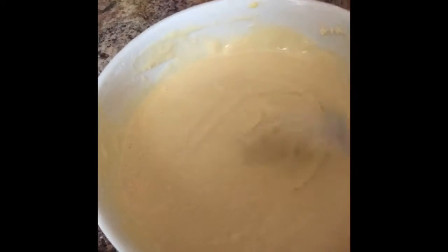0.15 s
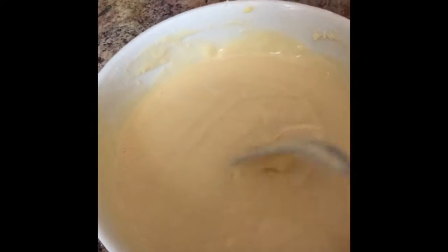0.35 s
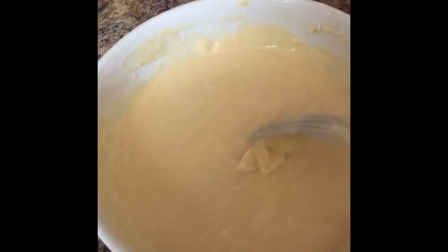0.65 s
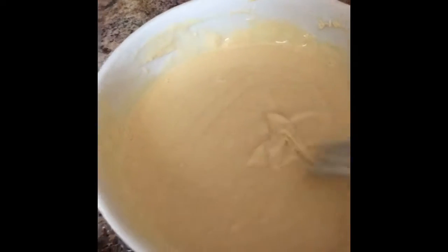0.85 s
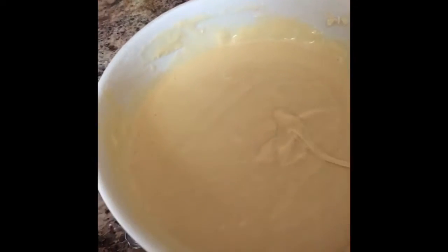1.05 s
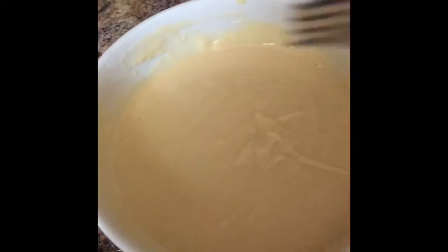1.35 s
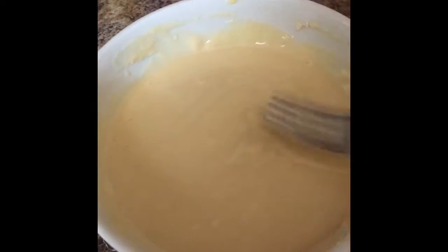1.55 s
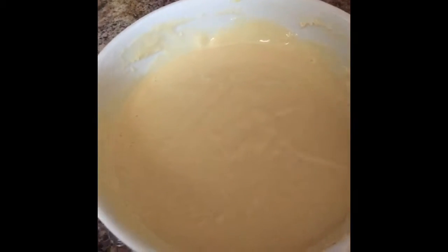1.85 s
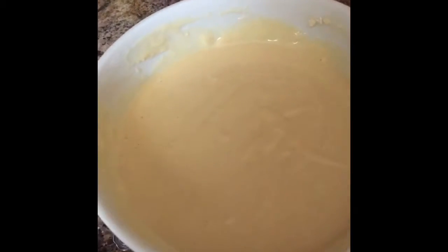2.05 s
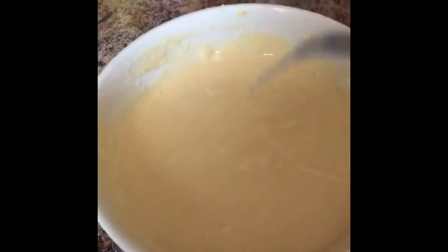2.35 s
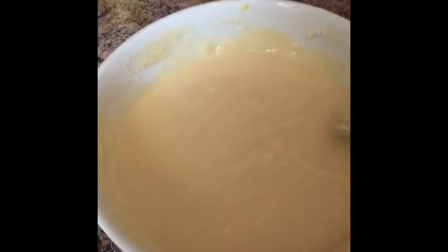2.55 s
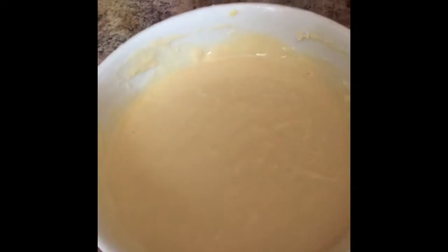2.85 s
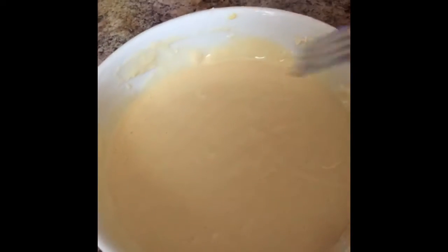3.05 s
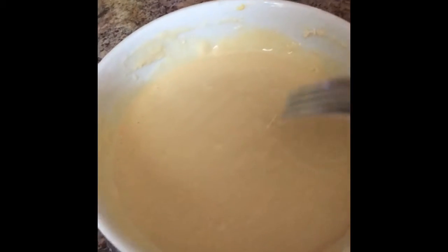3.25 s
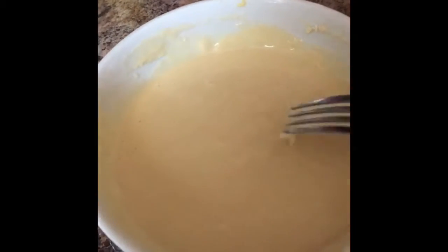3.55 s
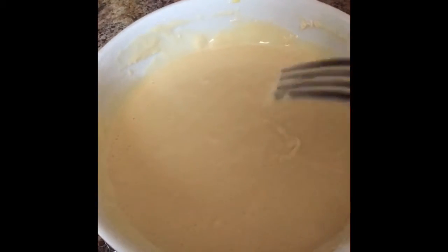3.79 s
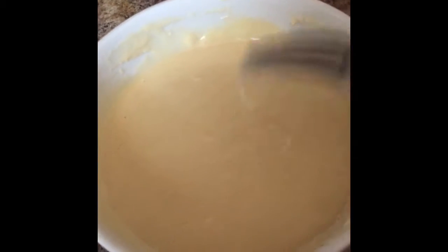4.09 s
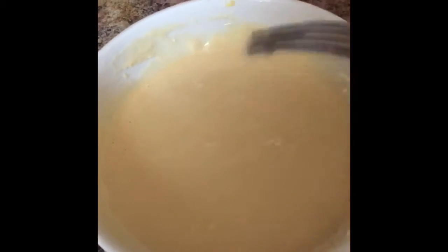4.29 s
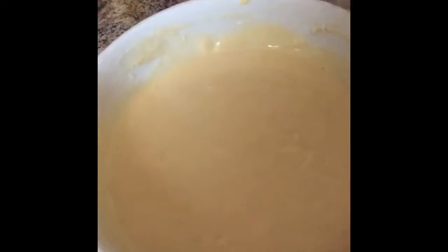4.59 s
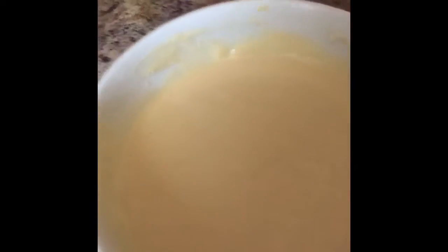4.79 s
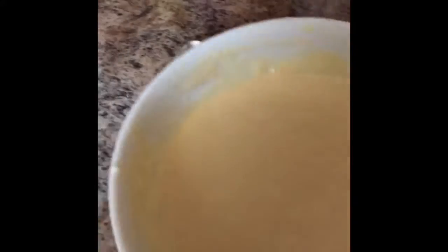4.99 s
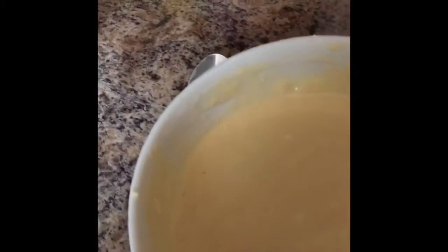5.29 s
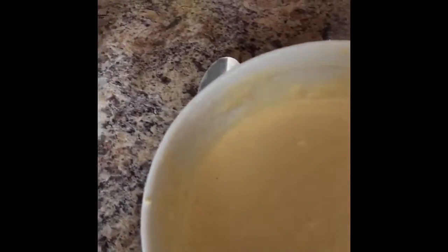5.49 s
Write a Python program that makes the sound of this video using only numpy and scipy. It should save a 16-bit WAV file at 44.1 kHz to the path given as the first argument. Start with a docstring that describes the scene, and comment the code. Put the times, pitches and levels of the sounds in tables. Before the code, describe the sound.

A fork clacks on the rim of a china bowl of batter in two quick runs, with single taps and wet slides between, over faint hum.

```python
"""A soft hum over room noise; then a fork knocks the rim of a china bowl of batter: two fast runs, two single taps between.
Each tap is a steel clack (filtered noise bursts), the ring of the bowl (decaying sines) and a thud into the counter (noise).
Between taps the fork slides wetly (bubble bursts), batter plops and tines graze the wall; faint rustles come last.
A small kitchen answers with decaying noise echoes; the close microphone's limiter ducks peaks above its ceiling."""
import sys
import numpy as np
from scipy import signal
from scipy.io import wavfile
from scipy.ndimage import uniform_filter1d, minimum_filter1d

SR = 44100
rng = np.random.default_rng(int(sys.argv[2]) if len(sys.argv) > 2 else 0)


def wav_record(signal):
    """Record a signal, one row per channel, as 16-bit PCM in the file named by sys.argv[1]."""
    frames = np.transpose(np.atleast_2d(signal))
    bounded = np.clip(frames, -1, 1)
    # unit amplitude maps onto the largest positive 16-bit level
    quanta = np.round(bounded * 32767).astype(np.int16)
    wavfile.write(sys.argv[1], SR, quanta)


N = 248283
TIME = np.arange(N) / SR
EDGES_HZ = np.geomspace(35, 17000, 28)
CENTRES_HZ = np.sqrt(EDGES_HZ[1:] * EDGES_HZ[:-1])
BANK = [signal.butter(2, EDGES_HZ[k:k + 2], "band", fs=SR, output="sos") for k in range(len(CENTRES_HZ))]


def from_db(db):
    """Decibels to amplitude."""
    return 10 ** (np.asarray(db) / 20)


def rms_one(x):
    """Scale to unit rms."""
    return x / np.sqrt(np.mean(x ** 2) + 1e-20)


def at_hz(points, hz):
    """Read a table on a log-frequency axis."""
    freqs, values = np.transpose(points)
    return np.interp(np.log(hz), np.log(freqs), values)


def dying(t, t60_s):
    """Exponential decay, 60 dB down at t60_s."""
    return np.exp(-np.log(1000) * t / t60_s)


def add(out, start_s, sound):
    """Mix a sound in from start_s."""
    start = int(start_s * SR)
    out[start:start + len(sound)] += sound[:N - start]


def bands(white):
    """Third-octave bands; neighbours are drawn from two unrelated inputs."""
    return np.array([signal.sosfilt(band, white[k % 2] + 1e-18) for k, band in enumerate(BANK)])


def resonance(x, hz, width_hz):
    """Two-pole resonance that keeps the power of white noise."""
    r = np.exp(-np.pi * width_hz / SR)
    gain = np.sqrt((1 - r * r) / 2)
    poles = [1, -2 * r * np.cos(2 * np.pi * hz / SR), r * r]
    return signal.lfilter(gain * np.array([1, 0, -1]), poles, x + 1e-18)


def strokes(rows, release_db_per_s, swell_db=30):
    """Gain of a row of strokes: each swells by swell_db over swell_s, holds and dies away."""
    gain = 0
    for full_s, swell_s, hold_s, level_db in rows:
        rise_db = swell_db * np.maximum(full_s - TIME, 0) / swell_s
        fall_db = release_db_per_s * np.maximum(TIME - full_s - hold_s, 0)
        gain = gain + from_db(level_db - rise_db - fall_db)
    return gain


# appliance hum: pitch_hz, level_db (rms)
HUM = [(59.2, -51), (118.4, -59.5), (199.2, -58.5), (306.8, -64.5)]
# quiet room noise: pitch_hz, density_db (per Hz)
AIR = [(35, -21), (55, 1), (85, -5), (160, 0.5), (250, -4), (350, 2.5), (630, -10.5), (1000, -12.5),
       (2000, -23.5), (4000, -27.5), (8000, -35), (13000, -29.5), (16000, -31.5)]
AIR_DB = -55


def background(waver=0.2):
    """An appliance hums, a little unsteadily in level and phase, over the soft noise of the room."""
    air = rms_one(from_db(at_hz(AIR, CENTRES_HZ)) @ bands(rng.standard_normal((2, N))))
    knots_s = np.linspace(0, TIME[-1], num=40)
    hum = 0
    for hz, level_db in HUM:
        swell, lag = [np.interp(TIME, knots_s, row) for row in rng.normal(0, waver, (2, len(knots_s)))]
        tone = np.sin(2 * np.pi * hz * TIME + lag * hz / HUM[0][0])
        hum = hum + from_db(level_db) * np.sqrt(2) * (1 + swell) * tone
    return from_db(AIR_DB) * air + hum


# fork on rim: start_s, force_db, weight_db (hand behind it), place (0 neck, 1 tines, 1.5 very tips),
#   lower_ring_db, upper_ring_db (wall; vary with where the rim is struck)
TAPS = [(0.2532, -33, -28.5, 0.068, 1, 3.5), (0.4037, -28, -23.5, 0.039, 1, 3),
        (0.5778, -26.5, -22, 0.021, 0.5, 3), (0.7297, -26.5, -27, 0.16, -3.5, 2),
        (1.6341, -34.5, -31, 0.08, 3, 5), (2.5394, -31.5, -33.5, 1.45, 8.5, 3.5),
        (3.2646, -30.5, -30.5, 1.73, 5.5, -8.5), (3.42, -27.5, -26, 0.92, 2.5, -5.5),
        (3.577, -27.5, -25.5, 0.94, 1.5, -4), (3.7355, -28, -26.5, 1.32, -3, -5.5),
        (3.8991, -29.5, -30, 0.94, -3, 3.5), (4.054, -28, -29, 0.62, -2, 2),
        (4.2302, -24.5, -25.5, 0.66, -9, -6), (4.4132, -23, -28, 0.62, -8, -5.5)]
# fork drops back on the rim after the last hard taps: start_s, force_db
BOUNCES = [(3.913, -43.5), (4.0696, -34.5), (4.2472, -33), (4.431, -29.5)]
BOUNCE_PLACE, BOUNCE_WALL_DB = 0.4, -22   # it stays pressed on and damps the wall


def blows():
    """Taps and bounces alike, in the columns of TAPS."""
    return TAPS + [(s, db, db, BOUNCE_PLACE, BOUNCE_WALL_DB, BOUNCE_WALL_DB) for s, db in BOUNCES]


# contact spectrum, dull neck to bright tines: pitch_hz, neck_db, tines_db
CONTACT = [(500, 0, 0), (1090, -1.5, 1), (1800, -1, -5), (3200, 1.5, -6), (4700, 0.5, -5.5),
           (7000, -13, 11.5), (10500, 0, 8.5), (13400, -3.5, 9.5)]
WEIGHT_BELOW_HZ, FORCE_ABOVE_HZ = 200, 300
SIZZLE_HZ, SIZZLE_DB = 14800, 13   # the very tips sizzle: dB per unit of place beyond the tines


def drive(hz, force_db, weight_db, place):
    """How hard a blow drives each frequency (dB): the hand's weight sets the bass, force and place the rest."""
    freqs, neck_db, tines_db = np.transpose(CONTACT)
    contact_db = force_db + neck_db + min(place, 1) * (tines_db - neck_db)
    sizzle_db = contact_db[-1] + SIZZLE_DB * max(place - 1, 0)
    bass = [(WEIGHT_BELOW_HZ, weight_db), (FORCE_ABOVE_HZ, contact_db[0])]
    return at_hz([*bass, *zip(freqs, contact_db), (SIZZLE_HZ, sizzle_db)], hz)


LOWER_RINGS_HZ, RING_OCTAVES, UPPER_RING_HZ = (1785, 3150), .17, 4000
WALL_RING_HZ = 4700   # drive is read no higher than this


def wall_drive(hz, force_db, weight_db, place, lower_db, upper_db):
    """Drive of the bowl's modes (dB); the wall's two lower rings move together, as do all its upper ones."""
    lower = sum(np.abs(np.log2(hz / ring_hz)) < RING_OCTAVES for ring_hz in LOWER_RINGS_HZ)
    blow_db = drive(np.minimum(hz, WALL_RING_HZ), force_db, weight_db, place)
    return blow_db + lower_db * lower + upper_db * (hz > UPPER_RING_HZ)


NECK_SPOT_HZ, TINES_SPOT_HZ = 510, 900
SPOT_DB, SPOT_OCTAVES = 6, .25


def spot(hz, place):
    """The place that is struck favours one register of the bowl (dB)."""
    favoured_hz = NECK_SPOT_HZ * (TINES_SPOT_HZ / NECK_SPOT_HZ) ** min(place, 1)
    return SPOT_DB * np.exp(-(np.log2(hz / favoured_hz) / SPOT_OCTAVES) ** 2)


# colour of the steel contact: pitch_hz, density_db (per Hz)
CLACK = [(200, 9), (600, 2), (900, 11.5), (1300, -15), (2300, -2.5), (3600, 6.5), (4800, -7), (5800, 3.5),
         (8000, -1.5), (10000, 3.5), (12300, -5), (15500, 0)]
# fork resonances: pitch_hz, level_db, best_place (on the fork, excites it most)
FORK = [(6400, 0.5, .25), (9200, -1, 2.7), (10380, -6.5, 2), (10800, 1.5, .15), (13150, -2.5, 0.37),
        (15100, 5, 4.2)]
# broad clang of the wall while steel touches it: pitch_hz, width_hz, level_db
CLANG = [(1785, 130, -2), (2400, 300, -7), (3170, 170, -1), (4830, 300, 3), (6740, 200, -8)]
CLACK_DB, CLANG_DB, CLACK_DECAY_S = 27.5, 21.5, 0.0026
TINE_DB, TINE_WIDTH_HZ = 16.5, 450
FORK_REACH = 0.91   # how far from its best place a resonance still answers


def clacks(touch_s=0.0008):
    """Steel chatters on china for a few ms, driving fork and wall; the nearer the tips it lands, the brighter."""
    out, t = np.zeros(N), TIME[:SR // 12]
    envelope = np.exp(-t / CLACK_DECAY_S) * (1 - np.exp(-t / touch_s))
    for start_s, force_db, weight_db, place, *rings_db in blows():
        blow = force_db, weight_db, place
        chatter = rng.standard_normal((3, len(t))) * envelope
        strength_db = drive(CENTRES_HZ, *blow) + spot(CENTRES_HZ, place)
        add(out, start_s, from_db(CLACK_DB + strength_db + at_hz(CLACK, CENTRES_HZ)) @ bands(chatter))
        for hz, level_db, best_place in FORK:
            reach_db = -10 * ((place - best_place) / FORK_REACH) ** 2
            gain = from_db(TINE_DB + level_db + drive(hz, *blow) + reach_db)
            add(out, start_s, gain * resonance(chatter[2], hz, TINE_WIDTH_HZ))
        for hz, width_hz, level_db in CLANG:
            gain = from_db(CLANG_DB + level_db + wall_drive(hz, *blow, *rings_db))
            add(out, start_s, gain * resonance(chatter[2], hz, width_hz))
    return out


# bowl on the counter, lowest its rocking, highest the china wall: pitch_hz, level_db, t60_s
BOWL = [(63, 6, .18), (110.86, 10.5, 0.2), (208.8, 8.5, .21), (296, 0.5, 0.21), (377, 3.5, .15),
        (445, 3, .15), (490.7, 1, 0.18), (537.2, 3, .16), (824.5, 0, .17), (867, 0.5, 0.16),
        (1298, -6, 0.15), (1789, -1.5, 0.26), (2410, -8, 0.17), (3144, -0.5, 0.14), (4766, -3, 0.23),
        (4710, -2, 0.33), (4786, -4.5, .3), (5100, -11, 0.12), (6737, -10.5, 0.28)]


def bowl(spread_db=1.0, detune=0.012, push_s=0.015, twin_hz=35, twin_db=-4):
    """Every blow rings the bowl's modes; the low ones build with the push, the higher beat against a close twin."""
    out, t = np.zeros(N), TIME[:SR * 2 // 3]
    hz, mode_db, t60_s = np.transpose(BOWL)
    low = np.clip(300 / hz, 0, 1)
    envelope = dying(t, t60_s[:, None]) * (1 - np.exp(-t / (push_s * low[:, None])))
    for start_s, force_db, weight_db, place, *rings_db in blows():
        strength_db = wall_drive(hz, force_db, weight_db, place, *rings_db) + spot(hz, place)
        luck, shift, split = rng.standard_normal((3, len(hz)))
        pitch_hz = hz * (1 + detune * low * shift)   # moving batter loads the low modes
        twin_pitch_hz = pitch_hz + twin_hz * (1 - low) * split
        swing = np.sin(2 * np.pi * pitch_hz[:, None] * t)
        swing += from_db(twin_db) * np.cos(2 * np.pi * twin_pitch_hz[:, None] * t)
        add(out, start_s, from_db(mode_db + strength_db + spread_db * luck) @ (swing * envelope))
    return out


# dull rumble of bowl and counter: pitch_hz, density_db (per Hz)
RUMBLE = [(40, -14.5), (80, -5), (120, 2), (210, -5), (320, -3.5), (500, -8), (850, -13.5), (1400, -15),
          (2500, -26.5), (6000, -57)]
RUMBLE_DB, RUMBLE_PEAK_S = 21.5, .011


def rumble(delay_s=.009):
    """Just after each blow the heavy bowl judders on the counter."""
    out, t = np.zeros(N), TIME[:SR // 6]
    envelope = t / RUMBLE_PEAK_S * np.exp(1 - t / RUMBLE_PEAK_S)
    for start_s, force_db, weight_db, place, *_ in blows():
        judder = rng.standard_normal((2, len(t))) * envelope
        strength_db = drive(np.minimum(CENTRES_HZ, FORCE_ABOVE_HZ), force_db, weight_db, place)
        strength_db = strength_db + spot(CENTRES_HZ, place) + at_hz(RUMBLE, CENTRES_HZ)
        add(out, start_s + delay_s, from_db(RUMBLE_DB + strength_db) @ bands(judder))
    return out


# reverberation: pitch_hz, t60_s
ROOM_T60 = [(100, 1), (1000, 0.38), (4000, 0.32), (9000, .29), (16000, 0.2)]
ROOM_DB = -12


def kitchen(x, first_echo_s=0.0023, bass_hz=300):
    """Dense reflections that die sooner in the treble; the bass stays close and dry."""
    t = TIME[:SR // 2]
    tails = bands(rng.standard_normal((2, len(t)))) * dying(t, at_hz(ROOM_T60, CENTRES_HZ)[:, None])
    echo = (CENTRES_HZ / (CENTRES_HZ + bass_hz)) @ tails * np.clip(t / first_echo_s - 1, 0, 1)
    return signal.fftconvolve(x, echo / np.sqrt(np.sum(echo ** 2)))[:N]


# fork sliding through batter along the wall: full_s, swell_s, hold_s, level_db
SLIDES = [(.9, 0.083, 0.01, -50.5), (1.008, 0.013, 0.026, -49), (1.195, 0.11, .005, -61),
          (1.74, .1, 0.17, -54), (1.93, 0.041, .055, -70.5), (2.65, 0.15, 0.0042, -43.5)]
# bubble spectrum: pitch_hz, density_db (per Hz)
SLIDE_COLOUR = [(400, 1.5), (1000, -0.5), (2400, -11), (4500, -7.5), (8000, -11.5), (12000, -9.5),
                (16000, -16)]
SLIDE_RELEASE_DB_PER_S = 172


def slide(bubbles_per_s=130, size_db=4, cycles=20, wall_db=-3, wall_width_hz=45):
    """Tiny bubbles of many sizes burst around the tines, whose rubbing keeps the china wall singing."""
    level = strokes(SLIDES, SLIDE_RELEASE_DB_PER_S)
    fizz = np.zeros(N)
    for hz in np.geomspace(500, 15000, num=24):   # bubbles_per_s at each pitch
        at = np.flatnonzero(rng.random(N) < bubbles_per_s / SR)
        bursts = np.zeros(N)
        bursts[at] = from_db(size_db * np.minimum(rng.exponential(1, N)[at], 4))
        fizz += from_db(at_hz(SLIDE_COLOUR, hz)) * np.sqrt(hz) * resonance(bursts, hz, hz / cycles)
    rubbing = level * rng.standard_normal(N)
    wall = sum(from_db(db) * resonance(rubbing, hz, wall_width_hz) for hz, _, db in CLANG)
    return level * rms_one(fizz) + from_db(wall_db) * wall


# batter sucking and dripping: start_s, level_db, pitch_hz (at the start)
PLOPS = [(0.899, -32, 880), (0.905, -25, 189), (0.985, -39.5, 2200), (1.009, -38.5, 504),
         (1.784, -37, 3900), (1.815, -41, 2340), (1.833, -39, 6950), (1.884, -38, 4540),
         (2.619, -35.5, 2100), (2.637, -31, 2390), (2.643, -33, 4520), (2.721, -49, 2420)]
PLOP_T60_S = 0.1


def plops(rise_per_s=1.3, swell_s=0.0027, rough=0.73):
    """Air pockets open in the batter: short, rough rings that rise in pitch."""
    out, t = np.zeros(N), TIME[:SR // 8]
    envelope = dying(t, PLOP_T60_S) * (1 - np.exp(-t / swell_s))
    for start_s, level_db, hz in PLOPS:
        tone = np.sin(2 * np.pi * hz * t * (1 + rise_per_s * t)) / 2
        noise = rough * resonance(rng.standard_normal(len(t)), hz, hz / 10)
        add(out, start_s, from_db(level_db) * (tone + noise) * envelope)
    return out


# tines grazing the wall: start_s, level_db
GRAZES = [(.945, -45), (1.005, -47), (1.028, -63), (1.224, -48.5), (1.978, -53)]


def grazes(decay_s=.005, hiss_db=2):
    """Light touches of steel hiss and excite the wall's clang resonances equally."""
    out, t = np.zeros(N), TIME[:SR // 12]
    for start_s, level_db in GRAZES:
        chatter = from_db(level_db) * rng.standard_normal(len(t)) * np.exp(-t / decay_s)
        clang = sum(resonance(chatter, hz, width_hz) for hz, width_hz, _ in CLANG) / 2
        add(out, start_s, from_db(hiss_db) * chatter + clang)
    return out


# faint rustles once the beating stops: full_s, swell_s, hold_s, level_db
RUSTLES = [(4.94, .055, .005, -67), (5.3, .17, 0.19, -70)]
RUSTLE_RELEASE_DB_PER_S = 180


def rustle(centre_hz=2600, width_hz=4000):
    """A soft, faint brushing: broad resonant noise in slow swells."""
    return strokes(RUSTLES, RUSTLE_RELEASE_DB_PER_S) * resonance(rng.standard_normal(N), centre_hz, width_hz)


def scene():
    """Bowl and fork close by, in the humming kitchen."""
    near = clacks() + bowl() + rumble() + plops() + slide() + grazes()
    return (near + from_db(ROOM_DB) * kitchen(near) + rustle() + background())[None]


def limiter(x, ceiling=0.66, hold_s=0.0065, release_db_per_s=1900):
    """Peaks above the ceiling pull the gain down at once; it is held briefly and springs back."""
    over_db = 20 * np.log10(np.maximum(np.abs(x) / ceiling, 1))
    hold = 2 * int(hold_s * SR / 2) + 1
    held_db = -minimum_filter1d(-over_db, hold, origin=hold // 2)
    release_db = release_db_per_s * TIME
    duck_db = np.maximum.accumulate(held_db + release_db) - release_db
    return np.clip(x * from_db(-uniform_filter1d(duck_db, size=12)), -ceiling, ceiling)


MIC_LOW_HZ, CUTOFF_HZ = 50, 15800


def record(dry):
    """The limiter catches peaks; the deepest bass and the top are cut."""
    sound = signal.sosfilt(signal.butter(4, MIC_LOW_HZ, "high", fs=SR, output="sos"), limiter(dry[0]))
    return signal.sosfilt(signal.ellip(10, .2, 80, CUTOFF_HZ, fs=SR, output="sos"), sound)[None]


dry = scene()
out = record(dry)
wav_record(out)
```